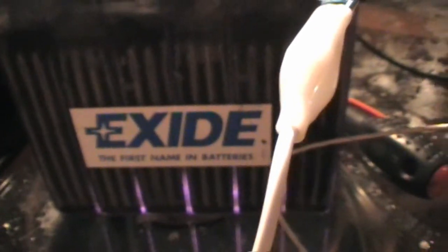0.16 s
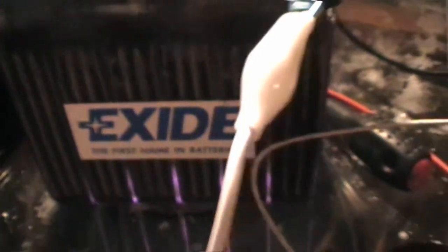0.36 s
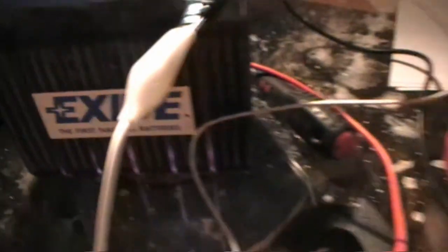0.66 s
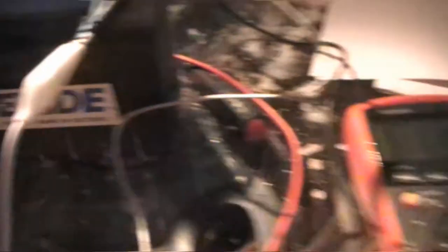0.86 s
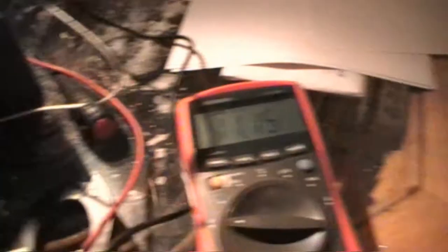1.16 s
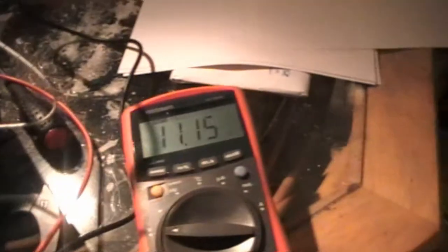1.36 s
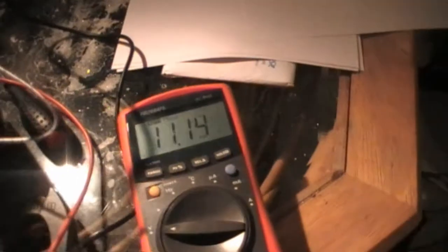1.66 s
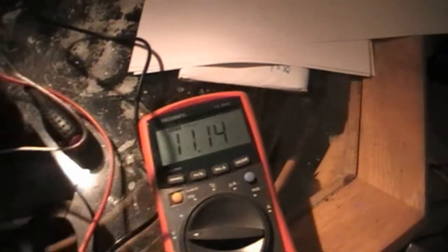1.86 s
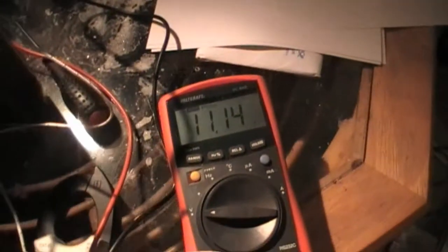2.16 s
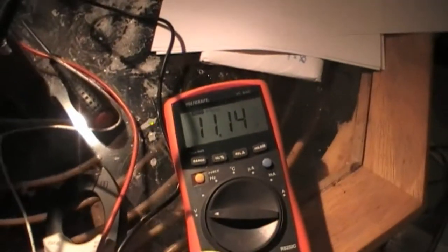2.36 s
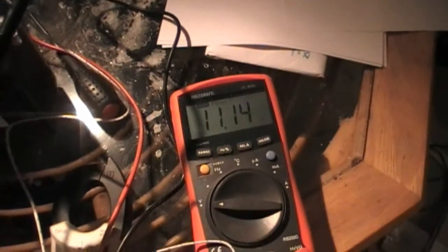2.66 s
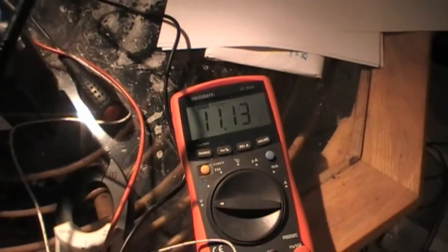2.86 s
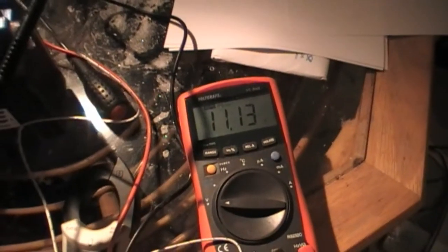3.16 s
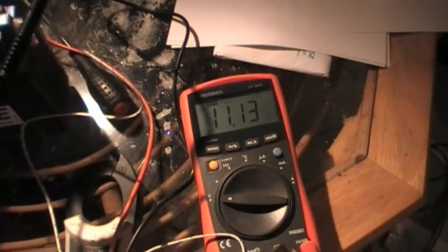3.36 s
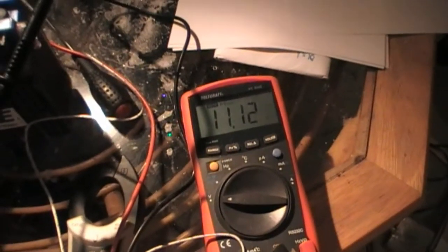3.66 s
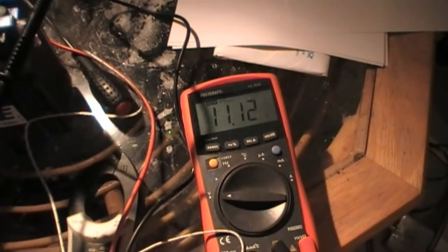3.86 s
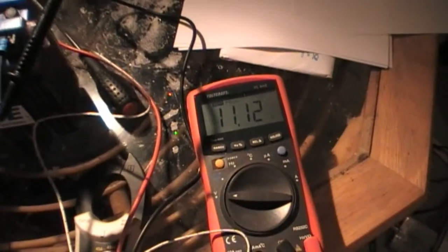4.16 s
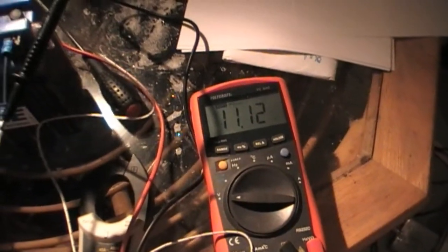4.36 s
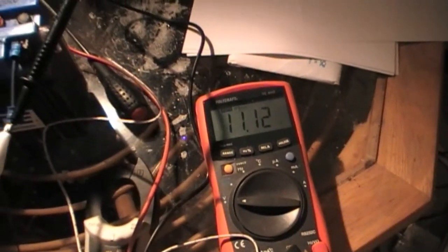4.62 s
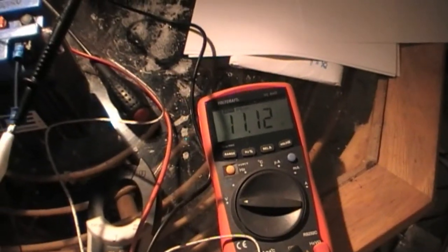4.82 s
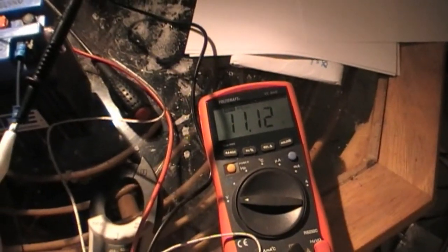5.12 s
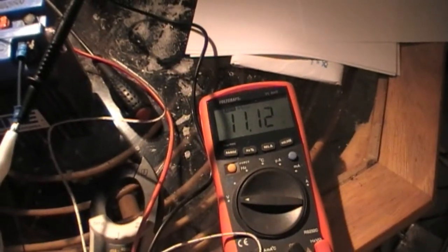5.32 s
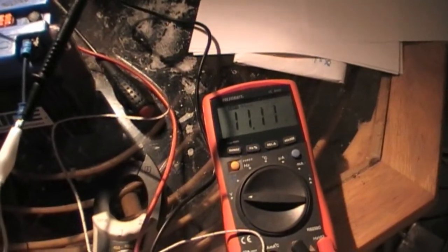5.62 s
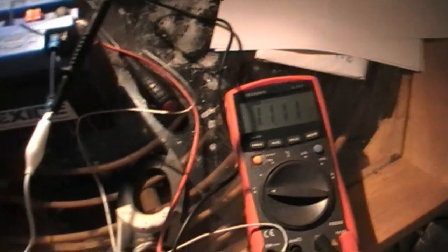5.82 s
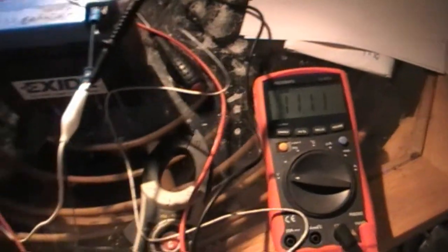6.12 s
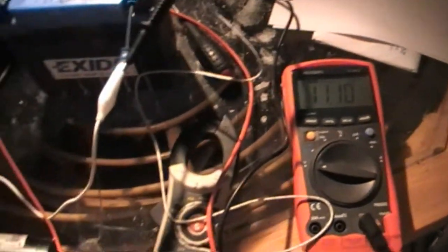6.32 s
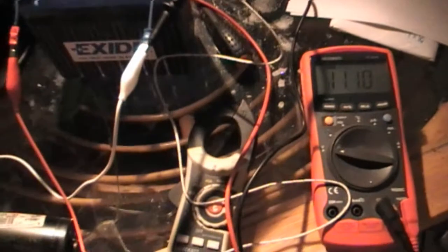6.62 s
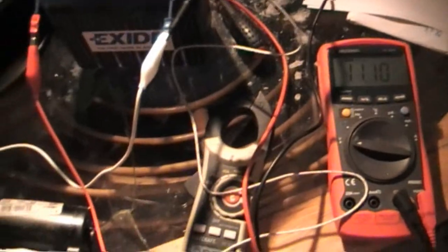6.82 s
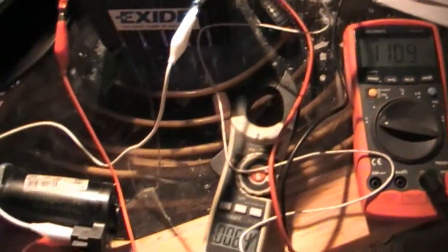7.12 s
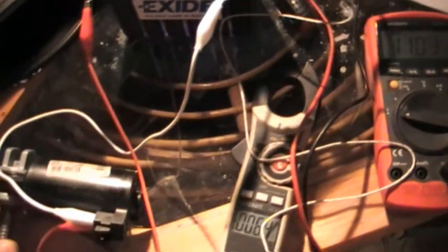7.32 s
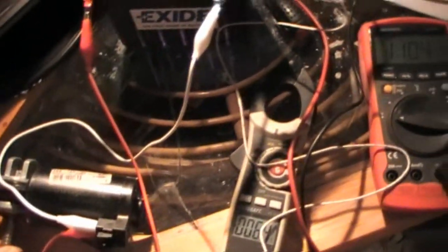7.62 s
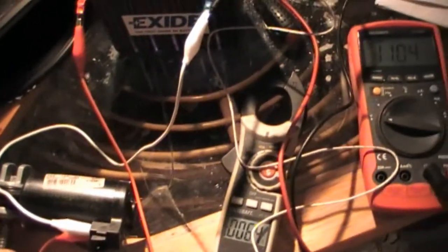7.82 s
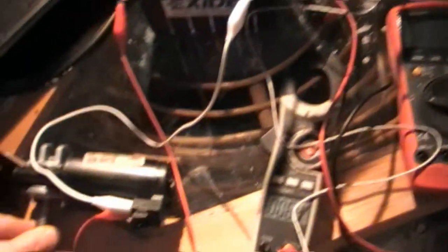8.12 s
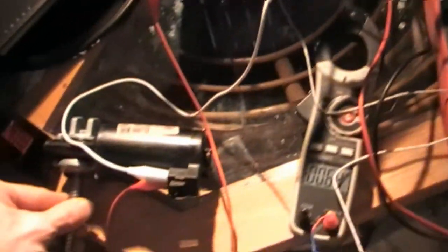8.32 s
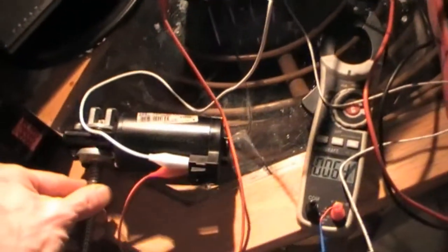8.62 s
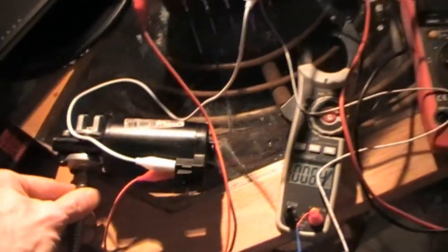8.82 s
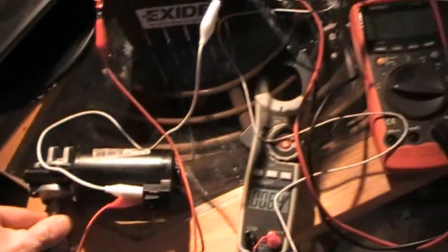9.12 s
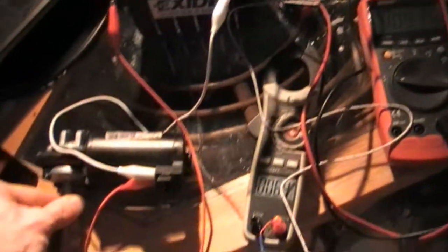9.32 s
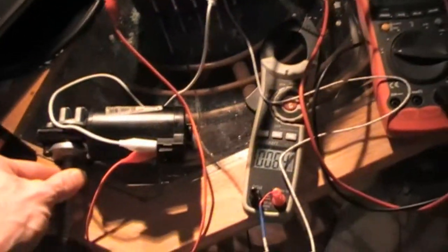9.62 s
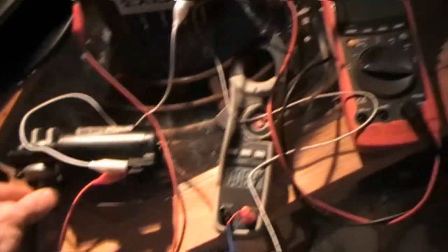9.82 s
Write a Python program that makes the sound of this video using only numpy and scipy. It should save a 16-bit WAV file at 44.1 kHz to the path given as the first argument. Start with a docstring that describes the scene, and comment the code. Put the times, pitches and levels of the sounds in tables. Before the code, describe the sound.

Close buzzing whine of a little geared motor recedes, runs evenly, then sags slightly in pitch and growls under hand braking, with bumps near the end.

```python
"""A small geared DC motor whines on a workbench; a hand-held microphone starts close and draws off within two seconds.
Ten armature slots sing as tones locked to the shaft, the brushes buzz, and the slack gears rattle alike each turn.
Leads tick now and then, small things scuff, and bearings and room make a smooth rush underneath.
From about 6.7 s a hand brakes the output shaft: it chafes, the speed sags, the gears tighten, the motor growls.
After 8.5 s the motor bumps on the bench; towards the end the second slot tone pulses deeply once a turn."""
import sys
import numpy as np
from scipy import signal
from scipy.fft import rfft, irfft, next_fast_len
from scipy.io import wavfile
from scipy.ndimage import uniform_filter1d, map_coordinates

SR = 44100
rng = np.random.default_rng(int(sys.argv[2]) if len(sys.argv) > 2 else 0)


def bounce(signal):
    """Save signal as a 16-bit WAV file at the path given by the first command-line argument."""
    frames = np.transpose(np.atleast_2d(signal))
    limited = np.clip(frames, -1, 1)
    pcm = np.round(limited * 32767).astype(np.int16)
    wavfile.write(sys.argv[1], SR, pcm)


N = 440118

# Levels below are nominal: ahead of slow wander, balance between the ports and the microphone's filters.
# "States" are three levels: [close by/dB, running free/dB, braked/dB].

# motor shaft speed: [t/s, speed/(turns per s)]
SHAFT_SPEED = [(0.0, 58.9), (0.35, 58.77), (0.65, 59.1), (2.7, 58.82), (3.3, 59.14), (4.2, 58.85),
               (5.2, 59.06), (5.8, 58.72), (6.6, 58.87), (7.3, 57.11), (7.68, 55.88), (8.25, 55.49),
               (8.5, 54.81), (9.05, 55.19), (9.45, 54.84), (9.98, 54.76)]
# nearness of the microphone: [t/s, nearness 0-1]
NEARNESS = [(0, 0.92), (.6, 0.87), (.95, 0.62), (1.3, 0.35), (2.0, 0.26)]
# load from the speed: turns per s running free, and turns per s lost under the full grip
FREE_SPEED, FULL_SAG = 58.8, 4.0
SLACK_LOAD = 0.34  # share of the full load that takes up all the slack in the gears
GEAR_RATIO = 23  # motor turns for one turn of the output shaft
# speed swing once per turn of the output shaft: turns per s, place of the crest 0-1
SWING, SWING_AT = 0.047, 0.2

# main slot tone, at ten times the shaft speed: [t/s, level/dB]
SLOT_LEVEL = [(0.0, -44.5), (0.9, -45.5), (1.7, -57.5), (2.4, -54.5), (6.7, -52), (7.1, -62), (7.5, -60),
              (7.6, -64), (8.1, -63), (9.98, -56.5)]
# other slot overtones: multiple of the shaft speed -> states
SLOT_OVERTONES = {20: (-52.5, -70, -59.5), 30: (-59.5, -68, -64), 110: (-60, -69, -86),
                  120: (-61.5, -68, -72), 130: (-81, -69, -69), 140: (-63, -74.5, -72.5),
                  150: (-60, -78, -80), 170: (-61.5, -93, -87)}
# shrill overtones, which swell and fade as the microphone moves: multiple of shaft speed -> [t/s, level/dB]
SHRILL_OVERTONES = {60: [(0, -52), (.45, -55), (1.3, -65), (1.6, -72), (2.0, -64.5), (2.6, -66),
                    (3.0, -66.5), (3.2, -75), (4.5, -71), (5.6, -85), (6.2, -67), (6.6, -62.5), (6.85, -75),
                    (8.7, -70.5), (9.4, -65.5), (9.98, -62.5)], 70: [(0.0, -59.5), (.6, -53.5),
                    (1.3, -59.5), (1.9, -57), (3.1, -60.5), (4.3, -62.5), (5.7, -66.5), (6.0, -72),
                    (6.35, -67), (6.7, -81), (8.9, -72), (9.3, -63.5), (9.98, -66.5)], 80: [(0.0, -53.5),
                    (0.9, -55), (1.15, -66), (1.8, -67), (3.2, -66.5), (4.3, -63), (6.3, -60), (7.3, -58),
                    (8.5, -63), (9.2, -67.5), (9.98, -65)], 90: [(0.0, -50), (0.7, -51), (1.1, -62),
                    (1.65, -58), (2.6, -78), (2.9, -94), (4.2, -89), (5.0, -80), (6.9, -70), (7.3, -57),
                    (8.0, -75), (8.4, -70), (9.98, -60.5)], 100: [(0.0, -66), (.9, -53), (1.25, -67),
                    (1.9, -61.5), (5.1, -61), (6.5, -64), (6.85, -73), (7.7, -60.5), (8.55, -58),
                    (9.98, -63)]}
SCATTER_DB = -75  # scattered sound of each shrill overtone, which breaks up the weak ones
# the hand presses and eases, and the three lowest slot tones surge:
# [t/s, length/s (spread of a bell curve), first/dB, second/dB, third/dB]
HAND_SURGES = [(7.433, 0.031, 4, 1.5, -5), (7.644, 0.05, -16, -2.5, -4), (8.0, 0.081, -2.5, -0.5, -8),
               (8.123, 0.039, 7, 0, 8.5), (8.244, .04, 1, 2.5, 5), (8.352, 0.027, -10, 3, 1),
               (8.496, 0.029, 6, 7, 6), (8.56, 0.022, -15, -5, -2), (8.678, 0.014, 3, 1, 5),
               (8.837, 0.12, 0, 6.5, -4), (9.015, 0.024, -12, -11, -7), (9.153, 0.14, 0, 3.5, -9)]
# pulsing of the second slot tone once a turn: [t/s, depth 0-1]
SECOND_TONE_PULSING = [(9.3, 0.15), (9.65, 0.7)]

# hum of the uneven rotor: multiple of the shaft speed -> states
ROTOR_ORDERS = {3: (-72.5, -83, -89.5), 5: (-63, -81.5, -80), 6: (-67, -84.5, -97), 7: (-60.5, -71.5, -79),
                8: (-56, -79.5, -85.5), 9: (-61, -65, -76), 12: (-77.5, -62.5, -96), 13: (-59, -71, -82.5),
                14: (-63, -68, -94), 16: (-65.5, -64.5, -78), 17: (-55.5, -68, -84), 18: (-58, -88, -84),
                21: (-54, -77.5, -70.5), 22: (-61, -87, -76), 23: (-53.5, -66, -89), 25: (-59, -79, -100),
                26: (-73.5, -66.5, -80), 37: (-68, -86, -69), 42: (-61.5, -74.5, -76)}
PINION_TEETH = 19  # they sing as they mesh
# tone of the meshing teeth: states
MESH_STATES = (-49, -54, -69.5)
PINION_RUNOUT = 0.0085  # turns; the pinion sits off centre, so its mesh leads and lags

# gear rattle: part -> [close by/dB, running free/dB, slack taken up/dB]
RATTLE_STATES = {"casing": (-53, -62, -75.5), "teeth": (-50.5, -57.5, -66), "tap": (-55.5, -66.5, -72)}
# end-play knock, loud close by, eased as the hand first brakes, back under the full load: [t/s, level/dB]
KNOCK_LEVEL = [(0, -50.5), (.8, -52), (1.5, -54.5), (2.6, -58), (6.6, -59), (7.3, -66), (8.15, -63),
               (8.6, -60.5), (8.9, -63), (9.98, -59)]
# where the parts strike on every turn: part -> [shaft angle 0-1, relative level/dB]
STRIKE_ANGLES = {"casing": [(.0, -0.5), (.2, 3), (.5, -1)], "teeth": [(.0, -11), (.22, 2), (.45, 0.5),
                 (.62, 2.5), (.8, -11.5)], "knock": [(.17, -6), (.59, 1), (.83, 0)], "tap": [(.18, -4),
                 (.66, 0.5)], "chafe": [(.16, -7.5), (.42, 6), (.62, -3), (.88, 0)]}
# the gears bind and ease at the same places on every output turn:
# part -> [swells per output turn, depth/dB, phase of the crest 0-1]
OUTPUT_THROB = {"slots": [(1, 0.9, 0.15), (3, 0.5, 0.95), (5, 0.5, 0.63)], "mesh": [(1, 2, 0.23),
                (3, 0.6, 0.48), (7, 2.5, 0.25)], "casing": [(1, 2.5, 0.67), (5, 1, 0.24)],
                "teeth": [(1, 5.5, 0.81), (3, 3, 0.63), (4, 1.5, 0.02)], "knock": [(3, 2, 0.45),
                (5, 1.5, 0.49), (9, 2, 0.85)], "tap": [(1, 1, 0.75), (4, 2, 0.28)]}
# resonances of casing, teeth, end-play knock and tap, each passed twice: [f/Hz, width of one pass/Hz, level/dB]
CASING_MODES = [(505.7, 106, 0.0)]
TEETH_MODES = [(1092, 143, 6.5), (1025, 72, -0.5)]
KNOCK_MODES = [(1350, 110, 3), (1820, 74, -4.5), (1940, 397, 6)]
TAP_MODES = [(2555, 94, -0.71), (2630, 285, -0.29)]

# flares of the chafing while the hand brakes the shaft: [t/s, level/dB, fade/(dB per s)]
CHAFE_FLARES = [(6.665, -53, 30), (6.70, -47, 40), (6.78, -44.5, 35), (6.835, -45, 43), (7.05, -52, 25),
                (7.12, -49.5, 83), (7.22, -52.5, 15), (7.62, -57.5, 29), (8.15, -57, 63), (8.5, -59, 66)]
FLARE_RISE_DB_PER_S = 260
# resonances of the chafing shaft, each passed twice: [f/Hz, width of one pass/Hz, level/dB]
CHAFE_MODES = [(1363, 125, 15.5), (1490, 78, 7)]

# brush noise: states
BRUSH_STATES = (-53.5, -63.5, -62.5)
# colour of the hiss, and of the buzz that repeats with every turn: [f/Hz, relative level/dB]
HISS_COLOUR = [(1500, -22), (2800, 1.5), (3500, 5), (4500, 5.5), (6500, 4), (8000, 5), (9200, 3.5),
               (10400, -7)]
BUZZ_COLOUR = [(1200, -13), (2000, -15), (2800, 12), (3300, -6), (3900, -16), (4400, 1), (5400, 14.5),
               (6200, 7), (7300, 10.5), (8000, 4.5), (9000, 8), (10400, 6.5), (12000, -51)]
# resonances of the brush holders, each passed twice: [f/Hz, width of one pass/Hz, level/dB]
HOLDER_MODES = [(4530, 260, 5.5), (5140, 170, 2), (5640, 130, -7), (6200, 210, 7), (6760, 440, -2),
                (7300, 220, -9), (8750, 400, 4), (9200, 430, 5), (10110, 980, -10), (7700, 18000, -10)]

# the motor bumps on the bench: [t/s, blow/dB, contact brightness f/Hz]
BENCH_BUMPS = [(8.575, -48, 2400), (8.5932, -31, 587), (8.610, -54, 900), (8.650, -48, 1300),
               (8.671, -48, 1900), (8.70, -49, 1100), (8.728, -53, 1500), (9.5526, -38.5, 8000),
               (9.569, -48, 3500), (9.585, -47, 3520)]
# ringing of the bumped bench: [f/Hz, relative level/dB, time to fall 60 dB/s]
BENCH_MODES = [(294, -8, 0.016), (380, -17, 0.011), (484, 3.5, 0.018), (720, -17, 0.078),
               (1020, 7.5, 0.014), (1350, 5.5, 0.0085), (1700, 1.5, 0.023), (2060, 7, 0.017),
               (2620, -2.5, 0.021), (3320, -6, 0.011), (6200, -3, 0.0085)]
# brief scuffs; from 8.1 to 8.5 s short growls of the braked motor near 500 and 1660 Hz, # and about 8.4 s a
# faint, slow, low scuff of something shifting near 264 Hz: # [t/s, length/s (spread of a bell curve), level/dB,
# f/Hz, width/Hz]
SCUFFS_AND_GROWLS = [(1.5, 0.12, -60, 5000, 7000), (1.518, 0.024, -62, 180, 160),
                     (5.92, 0.055, -55, 5600, 8900), (7.575, 0.011, -57, 490, 150),
                     (8.129, 0.062, -60.5, 515, 150), (8.15, 0.04, -55, 1680, 260),
                     (8.24, 0.025, -59, 1660, 258), (8.468, 0.016, -61, 503, 250),
                     (8.48, 0.036, -55, 1650, 262.9), (8.403, 0.21, -69.5, 264, 70),
                     (8.603, 0.022, -49, 400, 183.4), (8.675, 0.069, -54, 834, 750),
                     (8.704, 0.058, -58.5, 296, 200), (8.685, 0.031, -58, 2460, 1210),
                     (9.57, 0.019, -53, 1500, 1570)]
# sharp ticks of the leads, and from 8.5 s the hard edge of the bench bumps near 2.1 kHz:
# [t/s, peak/dB before the room, f/Hz, width/Hz]
SHARP_TICKS = [(1.294, -30, 1390, 700), (3.2838, -30, 5500, 3000), (3.284, -25.5, 4100, 1099),
               (3.2851, -33, 7500, 4000), (3.2858, -28.5, 2042, 900), (7.6977, -36.5, 3260, 396),
               (7.6978, -31, 9500, 6000), (7.7154, -28.5, 9500, 2200), (7.7205, -43, 9050, 1300),
               (8.575, -41, 2080, 200), (8.593, -36, 2150, 400)]
TICK_ROOM_DB = -12  # the room's scatter after a tick

# rush of bearings and room, before the lift of nearness: [f/Hz, running free/(dB per Hz), braked/(dB per Hz)]
RUSH_COLOUR = [(24.8, -104, -103), (55, -107, -107), (111, -101, -100), (176, -101, -99), (320, -99, -98.5),
               (375, -95, -99), (636, -86.5, -92.5), (780, -90.5, -95), (945, -83.5, -99),
               (1250, -93.5, -100), (1510, -90, -91), (2750, -104, -98), (3800, -112, -110),
               (10400, -130, -130)]
# width of the sound between the two ports: [f/Hz, side level/dB]
PORT_WIDTH = [(60, -2), (150, 5.5), (300, 2), (600, -5), (1200, -6.5), (2500, -2.5), (5000, -7.5),
              (8500, -2.5)]
MIC_LOW_CUT_HZ, CUTOFF_HZ = 202, 10500


def whine(turns, near, brake, wander_db=2.5):
    """Each slot passing the magnets tugs the housing: a tone at ten times the shaft speed, with overtones."""
    t = np.arange(N) / SR
    surge_db = sum(np.outer(dbs, np.exp(-0.5 * ((t - s) / length) ** 2)) for s, length, *dbs in HAND_SURGES)
    slot_levels_db = (in_time(SLOT_LEVEL) + throb("slots", turns, brake),
                      level(SLOT_OVERTONES[20], near, tightness(brake)),
                      level(SLOT_OVERTONES[30], near, brake))
    first, second, third = (tone(turns, 10 * (k + 1), db + surge_db[k] + 0.68 * drift(19), flutter=0.059)
                            for k, db in enumerate(slot_levels_db))
    pulse = 1 + in_time(SECOND_TONE_PULSING) * np.cos(2 * np.pi * (turns - 0.5))
    out = first + second * pulse + third
    for multiple, curve in SHRILL_OVERTONES.items():
        out += tone(turns, multiple, in_time(curve) + 0.84 * drift(11), flutter=0.033)
        out += tone(turns, multiple, SCATTER_DB, flutter=1.0) * drift(12)
    # the two lowest are already in, as second and third
    for multiple in sorted(SLOT_OVERTONES)[2:]:
        overtone_db = level(SLOT_OVERTONES[multiple], near, brake) + wander_db * drift(4.4)
        out += tone(turns, multiple, overtone_db, flutter=0.62)
    return out


def hum(turns, near, brake):
    """The uneven rotor hums at low orders; the off-centre pinion's mesh tone leads and lags once a turn."""
    rotor = sum(tone(turns, multiple, level(states, near, brake) + 2.3 * drift(6), flutter=0.13)
                for multiple, states in ROTOR_ORDERS.items())
    mesh_db = level(MESH_STATES, near, tightness(brake)) + throb("mesh", turns, brake)
    pinion = turns + PINION_RUNOUT * np.sin(2 * np.pi * turns)
    return rotor + tone(pinion, PINION_TEETH, mesh_db + 0.5 * drift(4.6), flutter=0.05)


def gears(turns, near, brake):
    """Slack is taken up several times a turn: casing and teeth flutter, the end play knocks and taps."""
    db = {part: level(states, near, tightness(brake)) + throb(part, turns, brake)
          for part, states in RATTLE_STATES.items()}
    knock_db = in_time(KNOCK_LEVEL) + throb("knock", turns, brake)
    casing_blows = strikes(turns, "casing", scatter=0.03, uneven_db=1.0, grit=0.2)
    teeth_blows = strikes(turns, "teeth", scatter=0.018, uneven_db=0.7, grit=0.2)
    knock_blows = strikes(turns, "knock", scatter=0.006, uneven_db=1.8, grit=0.1)
    tap_blows = strikes(turns, "tap", scatter=0.005, uneven_db=1.2, grit=0.15)
    casing = rattle(db["casing"], CASING_MODES, casing_blows)
    teeth = rattle(db["teeth"], TEETH_MODES, teeth_blows)
    knock = rattle(knock_db, KNOCK_MODES, knock_blows)
    tap = rattle(db["tap"], TAP_MODES, tap_blows)
    return casing + teeth + knock + tap


def chafing(turns):
    """Each flare rises fast, then fades; the shaft catches and slips on the same marks every turn: a rasp."""
    t = np.arange(N) / SR
    flares_db = [db - np.maximum(FLARE_RISE_DB_PER_S * (s - t), fade * (t - s)) for s, db, fade in CHAFE_FLARES]
    loudest_db = np.max(flares_db, axis=0)
    return rattle(loudest_db, CHAFE_MODES, strikes(turns, "chafe", scatter=0.016, uneven_db=2.0, grit=0.18))


def brushes(turns, near, brake, buzz_db=3.0, hiss_db=0.0):
    """The brushes ride the same rough commutator on every turn, and hiss at each of its ten gaps."""
    gaps = once_a_turn(10 * turns, at=0, depth_db=3.0) * once_a_turn(turns, at=0.87, depth_db=2.1)
    buzz = rms_one(colour(groove(turns, uneven_db=3.0) * gaps, BUZZ_COLOUR))
    hiss = rms_one(colour(stereo_noise() * gaps, HISS_COLOUR))
    return from_db(level(BRUSH_STATES, near, brake)) * (from_db(buzz_db) * buzz + from_db(hiss_db) * hiss)


def sizzle(turns, near, close_db=-52.5):
    """The rough contact rings the brush holders, which carry only a short way: gain follows nearness."""
    contact = groove(turns, uneven_db=2.0) + 0.3 * stereo_noise()
    return near * rattle(close_db, HOLDER_MODES, contact)


def bumps_scuffs_and_growls():
    """Blows ring the bench as decaying modes; scuffs and growls are short swells of banded noise."""
    out, t = np.zeros(N), np.arange(N) / SR
    blows = np.zeros(N)
    for s, db, hz in BENCH_BUMPS:
        # a soft contact spreads the blow in time and spares the high modes
        softness = signal.butter(4, min(hz, SR / 3), fs=SR, output="sos")
        blows += from_db(db) * signal.sosfilt(softness, impulse(s) + 1e-18)
    for k, (hz, db, t60) in enumerate(BENCH_MODES):
        r, w = from_db(-60 / (t60 * SR)), 2 * np.pi * hz / SR
        ring = signal.lfilter([0, np.sin(w)], [1, -2 * r * np.cos(w), r * r], blows)
        out += from_db(db) * ring * (-1) ** (k // 2)  # polarity turns over every two modes
    for s, length, db, hz, width in SCUFFS_AND_GROWLS:
        grit = rng.standard_normal(N) * from_db(3.0 * drift(300))
        band = rms_one(resonate(resonate(grit, hz, width), hz, 2 * width))
        out += from_db(db) * np.exp(-0.5 * ((t - s) / length) ** 2) * band
    return out


def ticks():
    """Shifting leads and the hard edge of the bumps: clicks, each ringing one resonance for a moment."""
    out = np.zeros(N)
    for s, db, hz, width in SHARP_TICKS:
        tick = resonate(impulse(s), hz, width)
        out += from_db(db) * tick / np.abs(tick).max()
    return out


def rush(near, brake, near_db=3.5):
    """Smooth noise of bearings and room, which changes colour under load and rises close by."""
    noise, table = stereo_noise() * np.sqrt(SR / 2), np.array(RUSH_COLOUR)
    free = colour(noise, table[:, [0, 1]])
    braked = colour(noise, table[:, [0, 2]])
    return from_db(near_db * near) * ((1 - brake) * free + brake * braked)


def workshop(x, wet_db=-3.0, t60=0.16):
    """The cluttered room answers with a short scatter of decaying noise, different at each port."""
    t = np.arange(SR // 3) / SR
    tail = rng.standard_normal((2, len(t))) * from_db(-60 * t / t60) * (t > 0.003)
    tail /= np.sqrt(np.sum(tail ** 2, axis=1, keepdims=True))
    scatter = signal.fftconvolve(x[None], tail, axes=1)[:, :N]
    return x + from_db(wet_db) * colour(scatter, [(2000, -1.5), (5000, 1.5)])


def tone(turns, multiple, level_db, flutter):
    """A line locked to a whole multiple of the shaft; its reflections shift slowly and differ between the ports."""
    angle = (2 * np.pi * ((round(multiple) * turns + rng.random()) % 1)).astype(np.float32)
    direct, late = np.cos(angle), np.sin(angle)
    mean_hz = multiple * turns[-1] * SR / N
    side_gain = from_db(at_hz(PORT_WIDTH, mean_hz) - 8.0)
    side = side_gain * (late * drift(1.276) + 0.57 * direct * drift(1.06))
    return np.sqrt(2) * from_db(level_db) * (direct + flutter * late * drift(22) + side * [[1], [-1]])


def strikes(turns, part, scatter, uneven_db, grit):
    """Blows at the same shaft angles every turn; timing and force wander over a few turns, with grit between."""
    out, whole = np.zeros((2, N)), np.arange(int(turns[-1]))
    for at, db in STRIKE_ANGLES[part]:
        wander = rms_one(uniform_filter1d(rng.standard_normal((4, 1024)), size=4))
        shared, left, right, force = wander[:, :len(whole)]
        for port, own in enumerate((left, right)):
            when = np.searchsorted(turns, whole + at + scatter * (shared + 0.12 * own))
            inside = when < N
            out[port, when[inside]] += from_db(db + uneven_db * force)[inside]
    return rms_one(out) + grit * (groove(turns) + 1.6 * stereo_noise())


def rattle(level_db, modes, impacts):
    """Tiny impacts ring a part of the motor, through each resonance twice."""
    rings = sum(from_db(db) * resonate(resonate(impacts, hz, width), hz, width) for hz, width, db in modes)
    return from_db(level_db) * rms_one(rings)


def groove(turns, uneven_db=0, size=720):
    """A rough track goes by once a turn: every order of the shaft, some groups stronger, at two ports."""
    orders = size // 2 + 1
    levels = from_db(uneven_db * rms_one(uniform_filter1d(rng.standard_normal(orders), size=2)))
    phases = np.exp(2j * np.pi * rng.random((2, orders)))
    tracks = irfft(rms_one(levels) * phases) * np.sqrt(size)
    mid, side = (map_coordinates(track, [turns % 1 * size], order=3, mode="grid-wrap") for track in tracks)
    return mid + colour(side, PORT_WIDTH) * [[1], [-1]]


def throb(part, turns, brake):
    """Swell in dB that repeats with the output shaft while the gears are slack."""
    swells = sum(db * np.cos(2 * np.pi * (round(lobes) * turns / GEAR_RATIO - at))
                 for lobes, db, at in OUTPUT_THROB[part])
    return (1 - tightness(brake)) * swells


def tightness(brake):
    """A light load already takes up the slack: 0 loose, 1 tight."""
    return np.clip(brake / SLACK_LOAD, 0, 1)


def level(states_db, near, brake):
    """Level in dB from the levels close by, running free and braked."""
    close_db, free_db, braked_db = states_db
    return free_db + near * (close_db - free_db) + brake * (braked_db - free_db)


def once_a_turn(turns, at, depth_db):
    """A swell that peaks at one angle of the shaft; unit power."""
    return rms_one(from_db(depth_db * np.cos(2 * np.pi * (turns - at))))


def stereo_noise():
    """White noise common to both ports, plus coloured noise of opposite sign at each."""
    mid, side = rng.standard_normal((2, N))
    return mid + colour(side, PORT_WIDTH) * [[1], [-1]]


def resonate(x, hz, width):
    """One two-pole resonance with about unit gain at its peak; width in Hz."""
    r = np.exp(-np.pi * width / SR)
    zeros = np.array([1, 0, -1]) * (1 - r * r) / 2
    poles = [1, -2 * r * np.cos(2 * np.pi * hz / SR), r * r]
    return signal.lfilter(zeros, poles, x + 1e-18)


def colour(x, spectrum):
    """Filter by a [f/Hz, level/dB] spectrum."""
    size = next_fast_len(N, True)
    gain = from_db(at_hz(spectrum, np.fft.rfftfreq(size, 1 / SR)))
    return irfft(rfft(x, size) * gain, size)[..., :N]


def at_hz(points, hz):
    """Read a spectrum on a log-frequency axis."""
    centres, values = np.transpose(points)
    return np.interp(np.log(np.maximum(hz, 1)), np.log(centres), values)


def drift(rate):
    """Slow chance: straight lines between random knots of spread 1, `rate` knots a second."""
    knots = rng.standard_normal(4096)
    return np.interp(np.arange(N) / SR * rate, np.arange(len(knots)), knots)


def in_time(rows):
    """A curve of [t/s, value] read at every sample."""
    return np.interp(np.arange(N) / SR, *np.transpose(rows))


def impulse(s):
    """A unit click at s seconds."""
    return signal.unit_impulse(N, round(s * SR))


def from_db(db):
    """Decibels to gain."""
    return 10 ** (np.asarray(db) / 20)


def rms_one(x):
    """Scale to unit power."""
    return x / np.sqrt(np.mean(x ** 2) + 1e-20)


def scene():
    """The motor leans a little left and centres as the load grows; brushes lean right; bumps and ticks join."""
    speed = in_time(SHAFT_SPEED)
    output_turns = np.cumsum(speed) / SR / GEAR_RATIO
    swing = SWING * np.cos(2 * np.pi * (output_turns - SWING_AT))
    turns = np.cumsum(speed + swing + 0.03 * drift(16)) / SR
    near = np.clip(in_time(NEARNESS), 0, 1)
    brake = np.clip((FREE_SPEED - speed) / FULL_SAG, 0, 1)
    motor = whine(turns, near, brake) + hum(turns, near, brake) + gears(turns, near, brake)
    motor += chafing(turns) + rush(near, tightness(brake))
    commutator = brushes(turns, near, brake) + sizzle(turns, near)
    left_db = 0.8 * (1 - brake)
    machine = motor * from_db(left_db * [[1], [-1]]) + commutator * from_db([[-0.7], [0.7]])
    return machine + workshop(bumps_scuffs_and_growls()) + workshop(ticks(), wet_db=TICK_ROOM_DB)


def record(dry):
    """The small microphone has no deep bass, and the top is cut steeply."""
    low_cut = signal.butter(2, MIC_LOW_CUT_HZ, "high", fs=SR, output="sos")
    top_cut = signal.ellip(16, 0.1, 80, CUTOFF_HZ, fs=SR, output="sos")
    return signal.sosfilt(top_cut, signal.sosfilt(low_cut, dry))


dry = scene()
out = record(dry)
bounce(out)
```